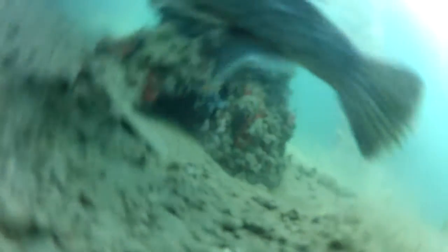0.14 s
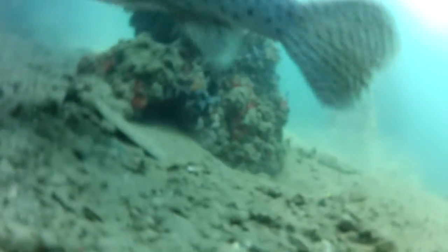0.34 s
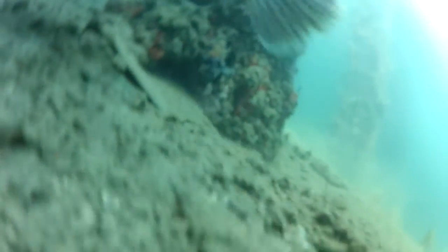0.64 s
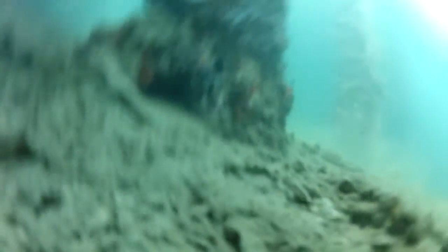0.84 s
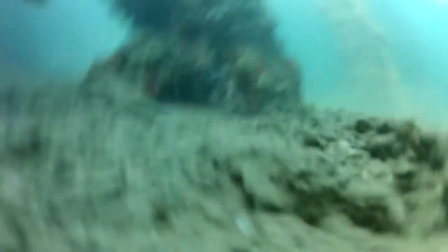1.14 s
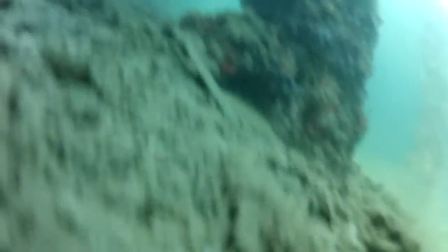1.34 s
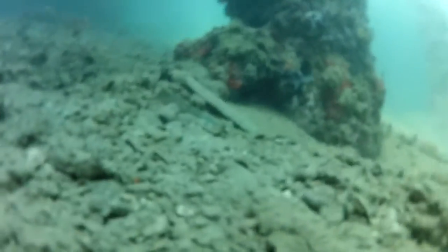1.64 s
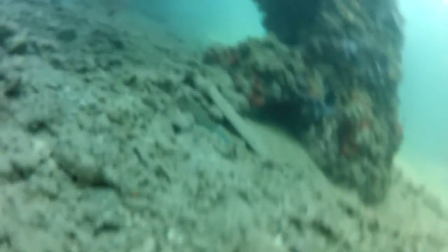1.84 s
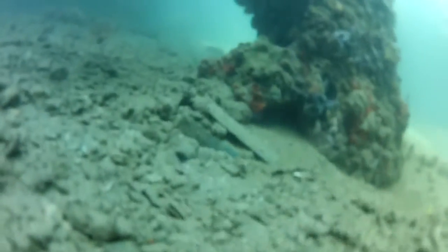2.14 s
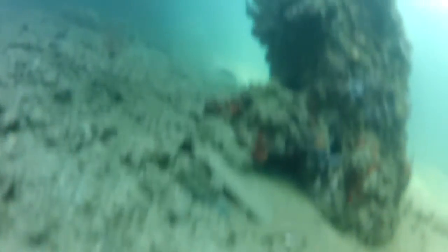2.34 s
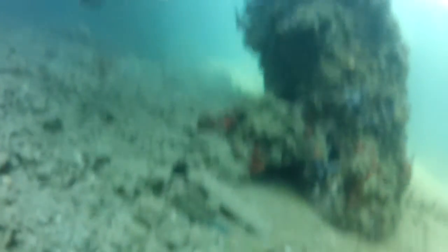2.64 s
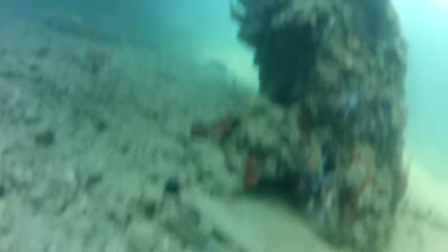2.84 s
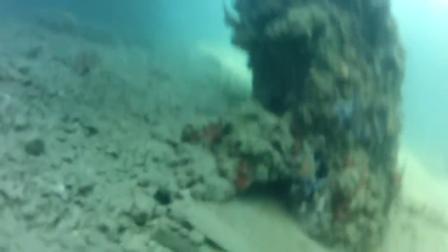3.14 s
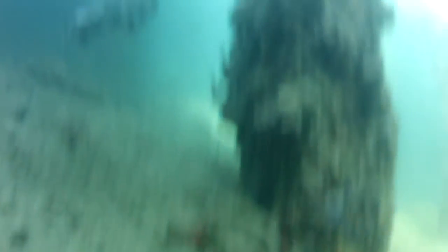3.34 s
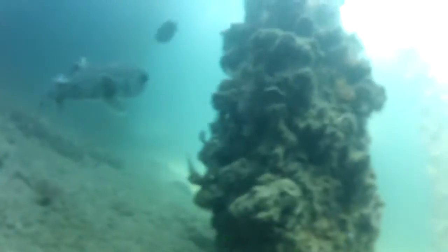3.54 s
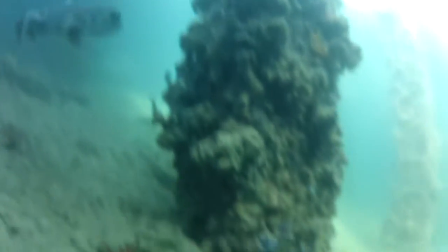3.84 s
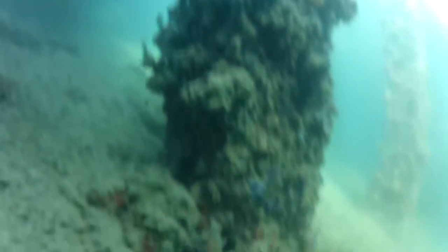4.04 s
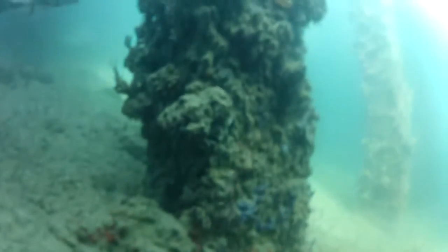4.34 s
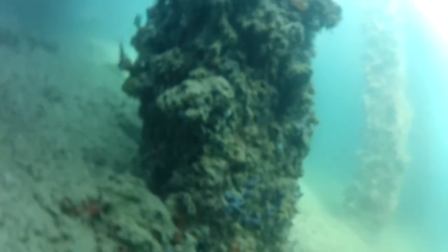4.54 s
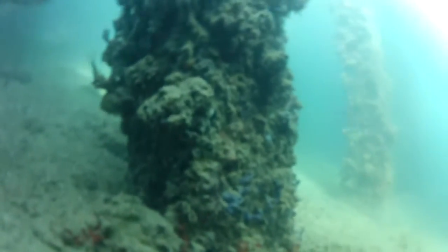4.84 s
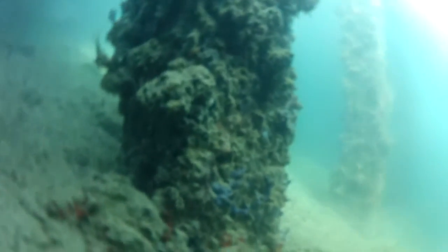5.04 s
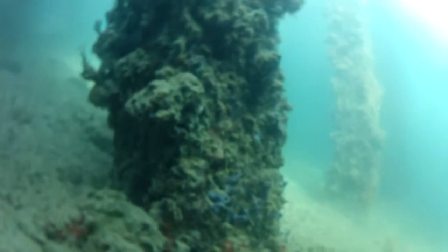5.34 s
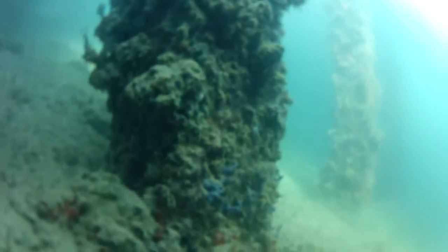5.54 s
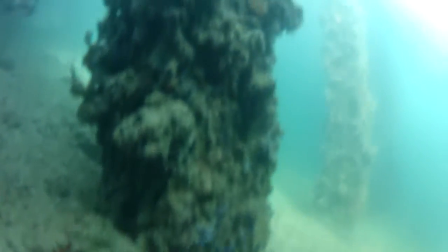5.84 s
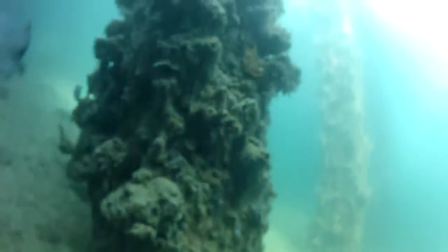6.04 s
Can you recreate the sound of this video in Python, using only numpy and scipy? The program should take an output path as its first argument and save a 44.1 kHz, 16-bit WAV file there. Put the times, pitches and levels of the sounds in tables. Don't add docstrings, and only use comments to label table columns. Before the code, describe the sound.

A boxy, low-fidelity underwater ambience heard from inside a sealed camera case. Shrimp snaps open it, close and brisk, above a distant frying crackle and weak bassy hiss. Soon the case bumps the bottom: a short cluster of loud overloaded clacks, ringing plastic-like knocks and gritty scrapes. The background seems to duck briefly, then steady ticking returns, scattered and uneven, growing stronger in the last half second. The fish and swaying view add no sounds of their own.

```python
import sys
import numpy as np
from scipy import signal
from scipy.fft import rfft, irfft
from scipy.io import wavfile

SR = 44100
rng = np.random.default_rng(int(sys.argv[2]) if len(sys.argv) > 2 else 0)


def attenuation_scalar(level_db):
    decades = np.asarray(level_db, float) / 20
    return 10 ** decades


def put_to_file(sound):
    columns = np.atleast_2d(sound).T
    safe = np.clip(columns, -1, 1)
    whole_steps = np.round(safe * 32767)
    wavfile.write(sys.argv[1], SR, whole_steps.astype(np.int16))


N = 273420


def resonances(x, peaks):
    out = 0
    for k, (hz, width_hz, db) in enumerate(peaks):
        radius = np.exp(-np.pi * width_hz / SR)
        poles = [1, -2 * radius * np.cos(2 * np.pi * hz / SR), radius * radius]
        zeros = [(1 - radius * radius) / 2, 0, (radius * radius - 1) / 2]
        out = out + (-1) ** k * attenuation_scalar(db) * signal.lfilter(zeros, poles, x + 1e-18)
    return out


# centre_hz [Hz], width_hz [Hz], level_db [dB]
LOW_SHELL = [(696.7, 48, 4), (900, 110, 6.5), (1000, 260, 3), (1090, 520, -6)]
# centre_hz [Hz], width_hz [Hz], level_db [dB]
MIDDLE_SHELL = [(1300, 210, -15.5), (1443.6, 130, -6.5), (1667, 100, -2), (1907, 252, 1.5), (2176, 410, 1),
                (2360, 117.5, 6)]
# centre_hz [Hz], width_hz [Hz], level_db [dB]
HIGH_SHELL = [(3015, 260, -2), (3532, 240, 7.5), (3801, 560, 1), (4730, 480, 0), (5096, 840, -1.5)]


def through_shell(dull, middle, bright):
    return resonances(dull, LOW_SHELL) + resonances(middle, MIDDLE_SHELL) + resonances(bright, HIGH_SHELL)


def echoes(count, early_t60, late_t60, late_db):
    t = np.arange(4000) / SR
    paths = rng.standard_normal((count, len(t)))
    spiky = paths * attenuation_scalar(2.98 * rng.exponential(1, (count, len(t))) - 7.5)
    early = attenuation_scalar(-60 * t / early_t60)
    late = attenuation_scalar(late_db - 60 * t / late_t60)
    return spiky * (early + late)


# time_s [s], level_db [dB]
COLONY_LEVEL = [
    (0, -51),
    (.7, -55.5),
    (1.35, -54),
    (2.5, -55.5),
    (3.5, -55),
    (4.8, -55.5),
    (5.4, -55.5),
    (6.2, -53.5),
]


def far_crackle(per_s, spread_db):
    sizes = attenuation_scalar(spread_db * np.minimum(rng.exponential(1, N), 4))
    snaps = sizes * (rng.random(N) < per_s / SR)
    path_of_snap = rng.integers(0, 6, N)
    paths = echoes(6, early_t60=.035, late_t60=.25, late_db=-13)
    water = 0
    for k, path in enumerate(paths):
        water = water + signal.oaconvolve(snaps * (path_of_snap == k), path)[:N]
    heard = through_shell(attenuation_scalar(-14.0) * water, water, attenuation_scalar(-9.5) * water)
    time_s, level_db = np.transpose(COLONY_LEVEL)
    return attenuation_scalar(np.interp(np.arange(N) / SR, time_s, level_db) + 2) * heard / heard.std()


# frequency_hz [Hz], density_db [dB per Hz]
NOISE_SPECTRUM = [(15, -35), (25, -3), (107, 3), (459, -5), (729, -11.5), (792, -22.5), (965, -6),
                  (1220, -16.5), (1300, -23), (1690, -27), (2860, -120)]


def input_noise():
    hz = np.maximum(np.arange(N // 2 + 1) * SR / N, 1)
    points_hz, points_db = np.transpose(NOISE_SPECTRUM)
    density_db = np.interp(np.log(hz), np.log(points_hz), points_db)
    noise = irfft(rfft(rng.standard_normal(N)) * attenuation_scalar(density_db), N)
    return attenuation_scalar(-61) * noise / noise.std()


# start_s [s], peak_db [dB], brightness_db [dB], favoured_hz [Hz]
CLOSE_SNAPS = [(0.0652, -17.5, -13, 1990), (.0864, -23.5, -13, 2396), (.196, -15.5, -30, 2360),
               (1.525, -26, -17, 2240), (1.5699, -22.5, -15, 1995), (1.6723, -25, -28, 2370),
               (1.7498, -26.5, -18.5, 2350), (1.9302, -29, -6, 2160), (1.9708, -15, -19.5, 2360),
               (2.2455, -24, -19.5, 2290), (2.6028, -28, -5.5, 2246), (2.6211, -25, -17, 2370),
               (2.6457, -27, -19, 2215), (2.8575, -24, -12.5, 2500), (2.8955, -26, -20, 1895),
               (2.998, -27, -9.5, 2340), (3.2701, -27, -17.5, 2410), (3.4525, -23.5, -14.5, 2020),
               (3.4827, -22, -11.5, 3410), (3.992, -25, -15, 3537), (4.069, -26, -25, 1964),
               (4.638, -25.5, -14.5, 2360), (4.9826, -18.5, -14.5, 2210), (5.3334, -24.5, -10.5, 2155),
               (5.539, -22, -16.5, 2193), (5.615, -6.5, -14, 2337), (5.9093, -16.5, -12.5, 2120),
               (5.993, -24.5, -20, 2350), (6.049, -25, -17.5, 2270), (6.1185, -14, -12.5, 2030)]
# start_s [s], peak_db [dB], brightness_db [dB], echo_db [dB]
MIDWAY_SNAPS = [(.127, -31, -10.5, -5.5), (0.2535, -33, -14, -6), (0.696, -33, -19.5, 1),
                (1.3547, -28, -12, -8.5), (1.6133, -32, -26, 4.5), (1.8508, -30, -13, -11.5),
                (2.0517, -31, -10, -7), (2.3685, -33.5, -16, -4.5), (2.4061, -32.5, -11.5, 3.5),
                (2.4654, -27.5, -18, -10), (2.5147, -31.5, -22, -8.5), (3.224, -38.5, -7, -6),
                (3.3293, -33.5, -14.5, -4), (3.5727, -33.5, -9.5, -6), (3.7813, -33.5, -11, -4),
                (3.9729, -34.5, -11, -8.5), (4.0092, -32, -3, -14), (4.15, -34.5, -12.5, -9),
                (4.3668, -36.5, -9, -11), (4.4911, -31, -14, -18), (4.5719, -30, -15, -3),
                (4.6077, -30.5, -14.5, -1), (4.697, -31.5, -24, -6.5), (4.8525, -29, -17.5, -15),
                (5.0645, -30.5, -23, -2), (5.1097, -32, -18, -13), (5.424, -32, -9.5, -6.5),
                (5.8012, -35.5, -9.5, -5.5), (6.0151, -31, -14, -5.5), (6.1811, -27.5, -10, -6.5)]
# start_s [s], peak_db [dB]
FAINT_SNAPS = [(.1108, -43), (.171, -40), (.3691, -45), (.4419, -55), (.4595, -44), (.605, -36),
               (1.715, -36.5), (1.7822, -35.5), (2.11, -38), (2.1689, -38), (2.2118, -42), (2.315, -39.5),
               (3.0943, -43.5), (3.2993, -40.5), (3.3432, -32.5), (3.426, -48), (3.6111, -35),
               (3.652, -32.5), (4.2232, -39.5), (4.416, -38.5), (4.475, -38), (4.6871, -38.5),
               (4.7954, -41.5), (5.0189, -39), (5.0497, -36), (5.353, -32), (5.3808, -37), (5.6819, -35.5),
               (5.8665, -36), (5.904, -37)]


def near_snaps(tint_width_hz, tint_db):
    def usual_echo(db):
        return -8.0 - 0.18 * (db + 28)

    favoured_hz = iter(rng.uniform(2050, 2420, len(MIDWAY_SNAPS) + len(FAINT_SNAPS)))
    rows = [(s, db, bright_db, usual_echo(db), hz) for s, db, bright_db, hz in CLOSE_SNAPS]
    rows += [(*row, next(favoured_hz)) for row in MIDWAY_SNAPS]
    rows += [(s, db, -12, usual_echo(db), next(favoured_hz)) for s, db in FAINT_SNAPS]
    dull_scatter_db = 3.5 * rng.standard_normal(len(rows))
    tails = echoes(len(rows), early_t60=0.044, late_t60=.16, late_db=-23.0)

    lead_size = 132
    lead_rise = attenuation_scalar(-29 + np.linspace(-28, 0, lead_size))
    leads = rng.standard_normal((len(rows), lead_size)) * lead_rise

    dull, middle, bright, tint = np.zeros((4, N + 4000))
    for row, scatter_db, tail, lead in zip(rows, dull_scatter_db, tails, leads):
        start_s, db, bright_db, echo_db, hz = row
        pulse = np.r_[lead, attenuation_scalar(echo_db - 4.5) * tail][:4000]
        pulse[lead_size:lead_size + 3] += 1
        dull_db = -22.5 - 0.45 * (db + 27.5) + scatter_db
        at = int(start_s * SR) - lead_size
        span = slice(at, at + 4000)
        middle[span] += attenuation_scalar(db + 12) * pulse
        bright[span] += attenuation_scalar(db + bright_db + 22) * pulse
        dull[span] += attenuation_scalar(db + dull_db + 19.5) * pulse
        tint[span] += attenuation_scalar(db + tint_db) * resonances(pulse, [(hz, tint_width_hz, 0)])
    return (through_shell(dull, middle, bright) + tint)[:N]


def ring(clicks, hz, t60):
    radius, turn = attenuation_scalar(-60 / (t60 * SR)), 2 * np.pi * hz / SR
    poles = [1, -2 * radius * np.cos(turn), radius * radius]
    return signal.lfilter([0, np.sin(turn)], poles, clicks + 1e-18)


# start_s [s], length_ms [ms], rattle_db [dB], ring_db [dB], ring_hz [Hz]
BLOWS = [(.7806, .3, -15, -17, 1900), (.8005, 5.5, -12, -14, 1400), (.8065, 4, -3, 3, 1650),
         (.826, 5, -48, -42, 850), (.948, 5, -13, -12, 1450), (.9874, 2.5, -3, 4, 1030),
         (1.1016, 2.5, -22, -14, 950), (1.1048, 3.5, -6, 2, 1000), (1.1055, 3, -20, -2, 850),
         (1.108, 4, -13, -7, 2150), (1.198, 3, -19, -11, 3400), (1.1985, 4.5, -5, -2, 1900)]
# start_s [s], length_ms [ms], rattle_db [dB], ring_db [dB], ring_hz [Hz]
TAPS = [(.746, 5.5, -34.5, -38, 900), (0.758, 4, -36.5, -28, 1000), (.788, 1.5, -15.5, -9, 1835),
        (.972, 9.8, -28.5, -31, 4000), (1.002, 5.4, -44, -44, 950), (1.024, 5.4, -38, -25, 1000),
        (1.035, 5, -38, -32.5, 900), (1.051, 15.6, -31.5, -30.5, 950), (1.073, 4.5, -25.5, -17, 1024),
        (1.1138, 5.4, -38.5, -10.5, 832), (1.121, 5.4, -28.5, -7.5, 1028), (1.1211, 2, -29.5, -18, 2100),
        (1.135, 3, -56, -32, 900), (1.2265, 2.75, -22, -23.5, 2000)]
# start_s [s], length_ms [ms], rattle_db [dB]
SCRAPES = [(0.7774, 2.7, -28.5), (.782, 3.5, -22.5), (.792, 8, -28), (0.896, 10, -48.5), (0.942, 3, -42),
           (.944, 4, -23.5), (.954, 20, -24), (.9858, 1.3, -17), (1.09, 4.6, -40), (1.178, 18, -54),
           (1.197, 3.9, -15.5), (1.234, 6, -41)]
# start_s [s], pitch_hz [Hz], level_db [dB], t60_s [s]
AFTER_RING = [
    (.8125, 1160, -44, .35),
    (.8125, 1190, -49, .35),
    (.8125, 850, -26, .06),
    (1.122, 860, -25, .065),
    (1.122, 1030, -26, .065),
]
# pitch_hz [Hz], level_db [dB], t60_s [s]
RATTLE_MODES = [(1020, -6, .02), (1480, -5, .012), (1800, 0, .01), (2050, 0, .012), (2350, -5, .012)]
# pitch_hz [Hz], level_db [dB], t60_s [s]
RATTLE_TOP_MODES = [(3000, -3, .008), (3520, 0, .011), (3950, -3, .009), (4350, -4, .009), (5200, -7, .006)]


def rattles(per_s, ring_cycles):
    rows = [(*row, -2.5) for row in BLOWS]
    rows += [(*row, -11.5) for row in TAPS]
    rows += [(s, ms, db, db - 14.5, 2000, 0) for s, ms, db in SCRAPES]
    slips = rng.standard_normal((len(rows), 1200))
    slips = slips * (rng.random(slips.shape) < per_s / SR)
    middle, top, out = np.zeros((3, N))
    for (start_s, length_ms, db, ring_db, hz, top_db), hail in zip(rows, slips):
        at = int(start_s * SR)
        size = int(np.clip(length_ms * SR / 1000, 4, 1200))
        hail = hail[:size]
        hail[0] += 1
        hail = hail / np.sqrt(min(np.sum(hail ** 2), 9.0))
        middle[at:at + size] += attenuation_scalar(db) * hail
        top[at:at + size] += attenuation_scalar(db + top_db) * hail
        bounces = np.diff(np.floor(np.arange(size + 1) * hz / SR + .99))
        rung = ring(np.pad(bounces + .5 * hail, (0, 4000)), hz, ring_cycles / hz)
        out[at:at + len(rung)] += attenuation_scalar(ring_db) * rung / np.abs(rung).max()
    for start_s, hz, db, t60 in AFTER_RING:
        out += attenuation_scalar(db) * ring(np.arange(N) == int(start_s * SR), hz, t60)
    for clicks, modes in (middle, RATTLE_MODES), (top, RATTLE_TOP_MODES):
        for hz, db, t60 in modes:
            uneven_clicks = clicks * attenuation_scalar(3 * rng.standard_normal(N))
            out += attenuation_scalar(db) * ring(uneven_clicks, hz, t60)
    return signal.sosfilt(signal.butter(4, 730, "high", fs=SR, output="sos"), out)


# start_s [s], length_ms [ms], pressure_db [dB], direction [+1 or -1]
SQUEEZES = [(0.747, 4.2, -35.5, 1), (0.802, 1.6, -21, 1), (0.9509, 2.65, -4.5, 1), (.8062, 5, 1, -1),
            (.8092, 3.2, 10, -1), (.8118, 3.2, 12, 1), (.9531, 2.2, -5, -1), (.9547, 3.4, 4, 1),
            (0.984, 3.4, -10, -1), (0.99, 5.4, -20, 1), (1.025, 7, -26.5, 1), (1.052, 7, -29.5, 1),
            (1.1023, 7.3, -19.5, 1), (1.104, 3.4, -3.5, -1), (1.1087, 3.9, -16, 1), (1.2, 5, -10, 1),
            (1.2244, 1.62, -13, -1), (1.2262, 2.15, -14.5, 1)]


def squeezes(leak_hz):
    out = np.zeros(N)
    for start_s, length_ms, db, direction in SQUEEZES:
        at, size = int(start_s * SR), int(length_ms * SR / 1000)
        pulse = np.sin(np.pi * np.arange(size) / size) ** 1.5
        out[at:at + size] += np.sign(direction) * attenuation_scalar(db) * pulse
    return signal.lfilter(*signal.butter(1, leak_hz, "high", fs=SR), out)


def scene():
    mono = near_snaps(tint_width_hz=140, tint_db=20)
    mono = mono + far_crackle(per_s=350, spread_db=3.0)
    mono = mono + rattles(per_s=2700, ring_cycles=16)
    mono = mono + squeezes(leak_hz=39.8)
    return np.tile(mono + input_noise(), (2, 1))


def gain_control(x, knee_db, share, release_db_s, attack_s):
    climb = release_db_s * np.arange(N) / SR
    over = share * np.maximum(20 * np.log10(np.abs(x) + 1e-9) - knee_db, 0)
    held = np.maximum(np.maximum.accumulate(over + climb) - climb, 0)
    r = np.exp(-1 / (attack_s * SR))
    return x * attenuation_scalar(-signal.lfilter([1 - r], [1, -r], held))


def top_cut(x):
    return signal.sosfilt(signal.butter(12, 16440, fs=SR, output="sos"), x)


def record(dry):
    x = gain_control(dry[0], knee_db=-12, share=.45, release_db_s=110, attack_s=.012)
    x = signal.sosfilt(signal.cheby1(6, .5, 5600, fs=SR, output="sos"), x)
    slow = np.clip(signal.resample_poly(x, 40, 147), -.98, .98)
    held = signal.resample_poly(np.repeat(slow, 4), 147, 160)[:N]
    held = signal.sosfilt(signal.cheby1(10, .5, 15300, fs=SR, output="sos"), held)
    held = np.clip(held, -.99, .99)
    grit = signal.lfilter([.05], [1, -.95], held * rng.standard_normal(N))
    side = attenuation_scalar(-27) * grit
    return top_cut(np.array([held + side, held - side]))


dry = scene()
out = record(dry)
put_to_file(out)
```